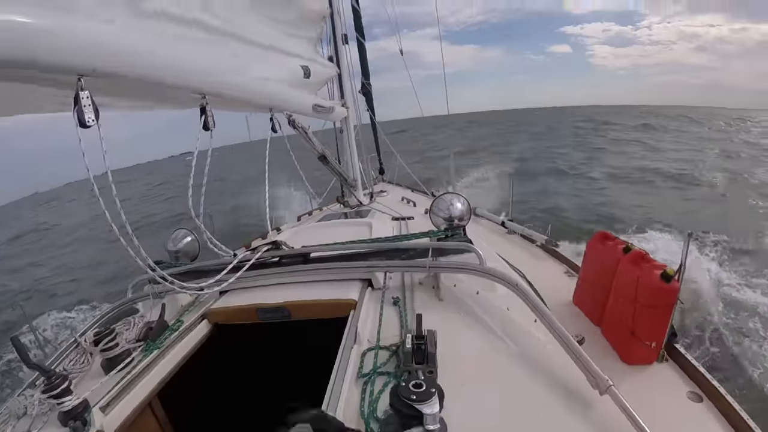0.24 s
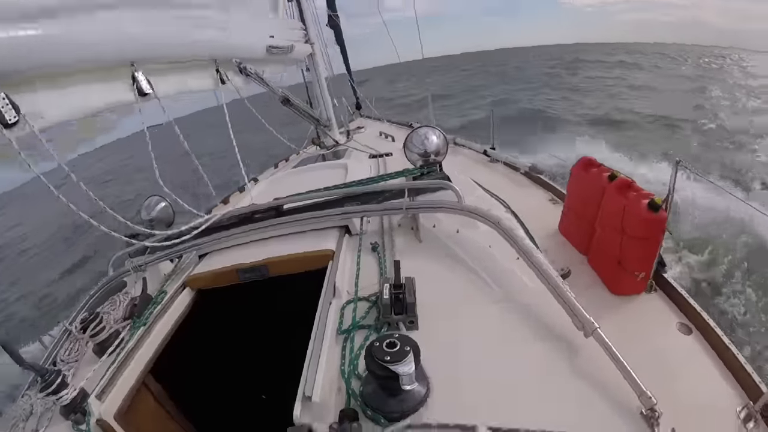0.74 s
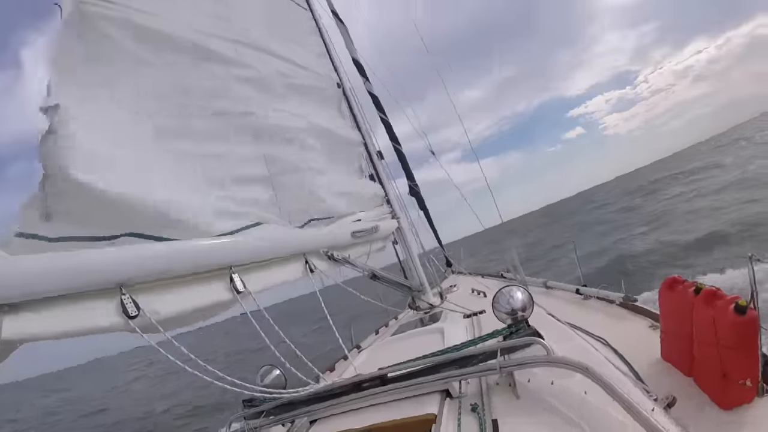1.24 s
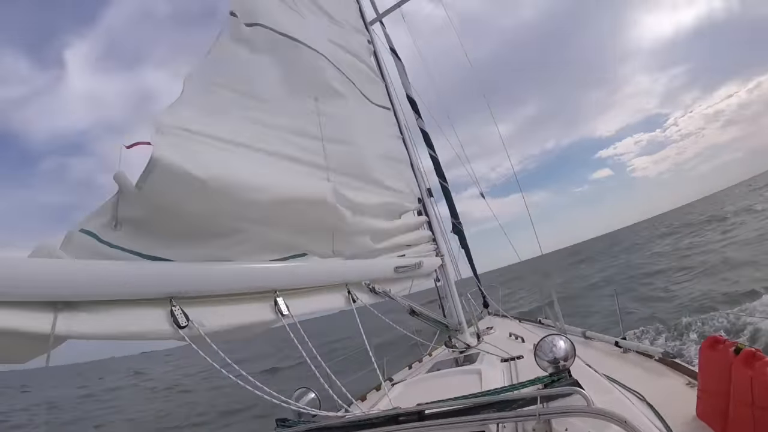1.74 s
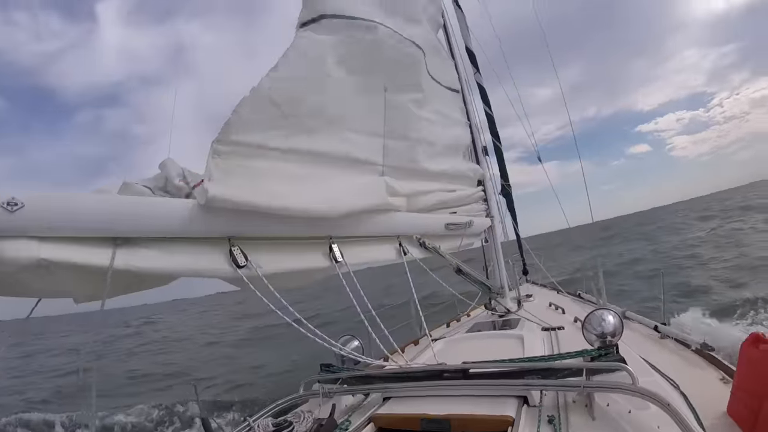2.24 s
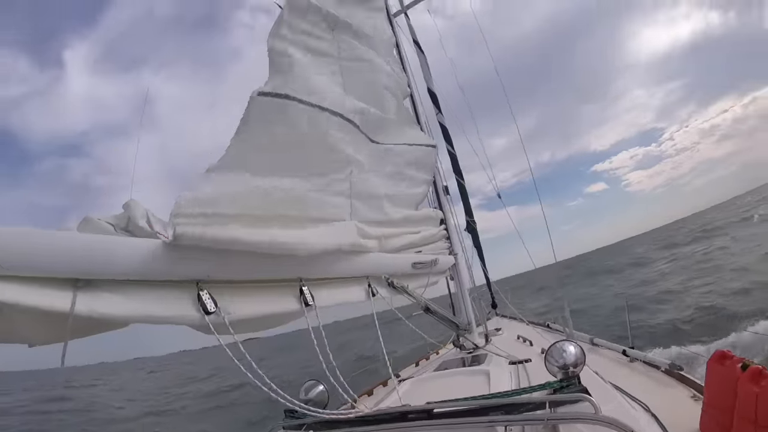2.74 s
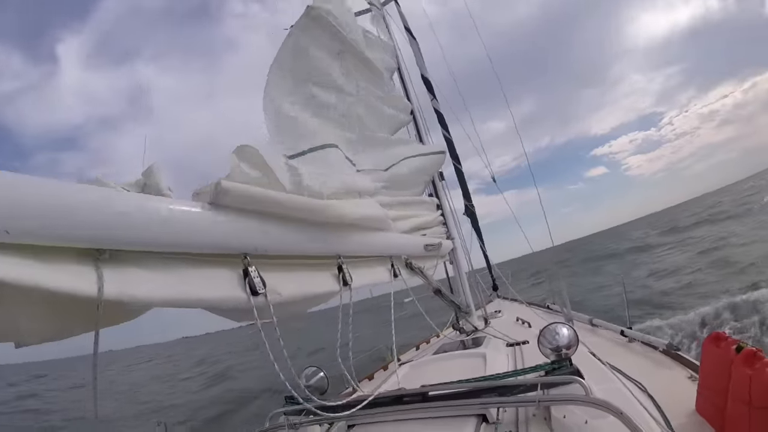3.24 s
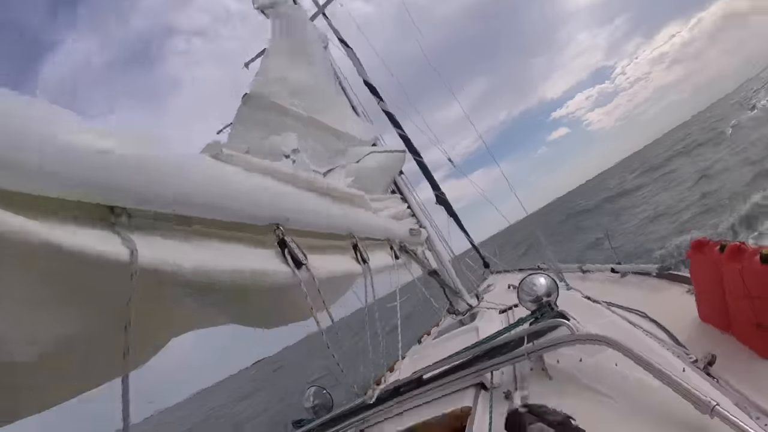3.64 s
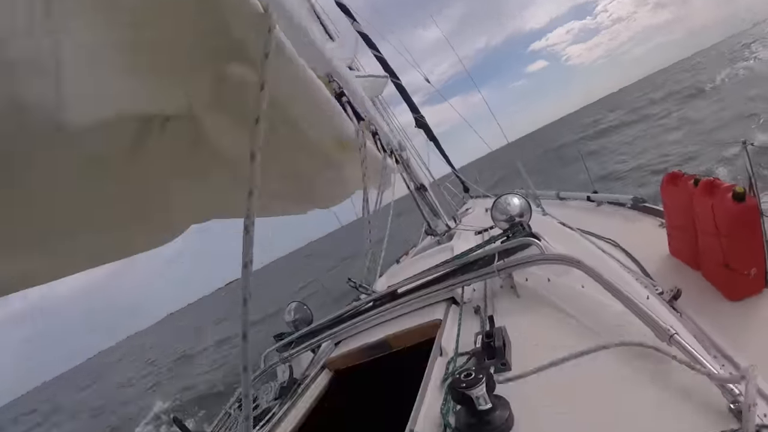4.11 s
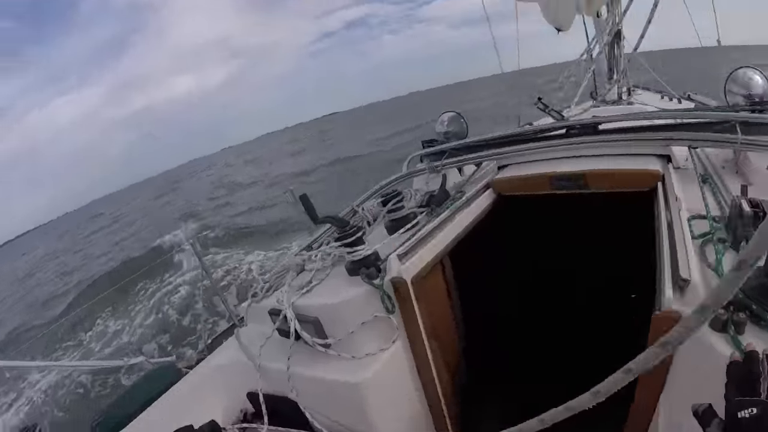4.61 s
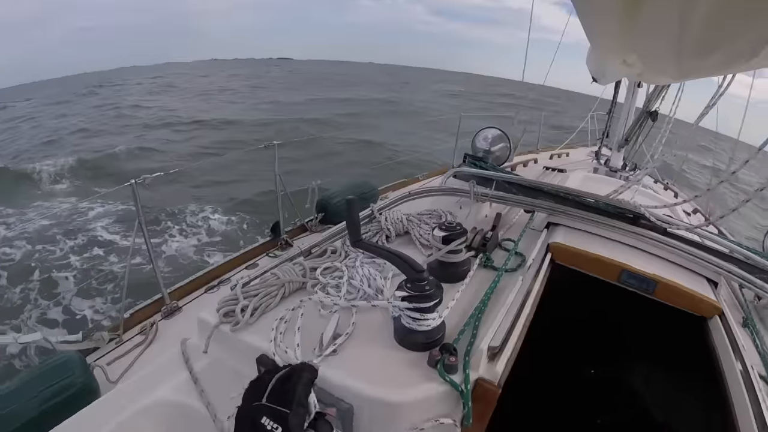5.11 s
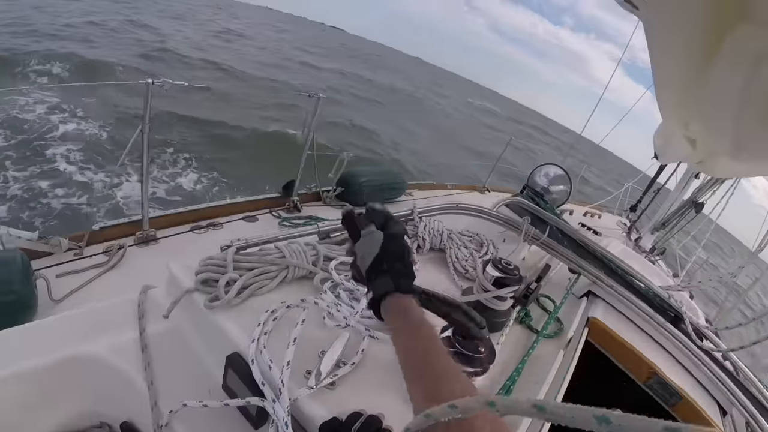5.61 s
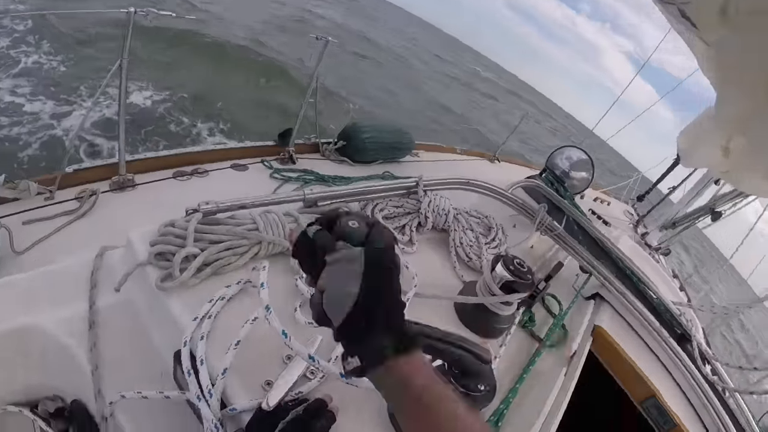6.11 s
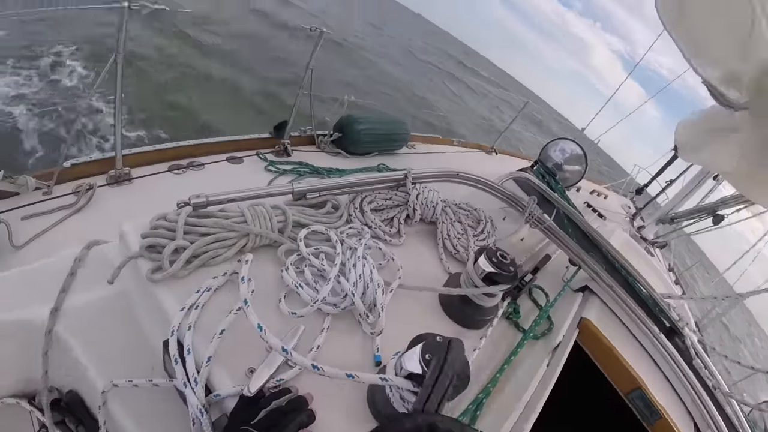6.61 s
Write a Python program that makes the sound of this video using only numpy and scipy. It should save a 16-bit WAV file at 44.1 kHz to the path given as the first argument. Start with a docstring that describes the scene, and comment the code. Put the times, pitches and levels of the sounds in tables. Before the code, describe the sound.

Lumpy wind rumble and roar with cracking sail and rushing water, the water abruptly fainter later, finishing in bright metallic winch ratcheting.

```python
"""On a heeling sailboat, wind buffets a small microphone: filtered noise gives a lumpy rumble and a roar,
and short pointed pushes give the thumps of turbulence. Water hisses past the hull as noise in drifting
patches, until it abruptly drops to a fainter hiss. Loose sail and rigging snap in noise bursts, with thin
ticks between. At the end a winch is cranked: its pawls click, knock and ring the drum. The winch rim rings
high and a block knocks on the deck, both as dying tones; a faint hiss lies behind it all."""
import sys
import numpy as np
from scipy import signal
from scipy.fft import rfft, irfft
from scipy.io import wavfile
from scipy.ndimage import uniform_filter1d

SR = 44100
rng = np.random.default_rng(int(sys.argv[2]) if len(sys.argv) > 2 else 0)


def convert_level_to_amplitude(level_db):
    """Map a level in decibels to its linear amplitude factor."""
    exponent = np.asarray(level_db, float) / 20
    return 10 ** exponent


def materialize(psi):
    """Save the field psi as 16-bit PCM at rate SR to the path in sys.argv[1].

    A 1-D psi becomes a single channel; in a 2-D psi each row is a channel.
    """
    bounded = np.clip(np.atleast_2d(psi).T, -1, 1)
    quanta = np.round(bounded * 32767).astype(np.int16)
    wavfile.write(sys.argv[1], SR, quanta)


N = 302526  # length in samples

# Wind between buffets, before trim: t/s, rumble level/dB, roar level/dB
WIND_LULL = [(0.0, -21.5, -39.5), (0.3, -21, -37), (0.7, -19.5, -38), (1.05, -28, -37.5),
             (1.45, -24, -36.5), (1.9, -21, -35), (2.2, -21.5, -34), (2.65, -25.5, -42), (2.85, -23.5, -39),
             (3.3, -23, -37), (3.85, -20, -30.5), (4.2, -19, -36), (4.5, -15.5, -30), (4.75, -24, -35.5),
             (5.1, -25, -35), (5.5, -19.5, -32.5), (6.1, -21, -29), (6.86, -20.5, -35)]
# Buffets, swells of turbulence, before trim:
# t/s, rumble level/dB, roar level/dB, length/s, extra roar tilt/(dB per octave)
BUFFETS = [(0.409, -9, -27, 0.031, 2), (0.515, -4, -27, .03, 2.5), (0.578, -8, -21, 0.046, -1.5),
           (0.663, -8.5, -17, .04, 4), (0.767, -15.5, -24, 0.057, -10), (0.875, -28, -31.5, 0.063, 11.5),
           (0.957, -9.5, -24.5, 0.029, -10), (1.247, -11, -32.5, 0.084, 5), (1.32, -11, -20.5, 0.048, 2.5),
           (1.4, -16.5, -32, 0.029, 4), (1.556, -22, -28, 0.02, -6), (1.665, -9, -19, 0.028, -0.5),
           (1.75, -21, -29.5, 0.064, -4), (1.853, -7, -16, 0.019, 1), (1.96, -19, -29.5, 0.045, 6.5),
           (2.06, -14.5, -21, 0.08, 0), (2.28, -12.5, -22, 0.056, -1), (2.423, -20.5, -29, 0.1, 2),
           (2.569, -11.5, -19.5, 0.024, -12), (2.818, -34, -29, 0.09, 2.5), (3.041, -11, -20, 0.17, -0.5),
           (3.218, -12, -29, .05, 2), (3.313, -15, -26, 0.057, -5), (3.461, -15.5, -29, 0.088, -3),
           (3.698, -14, -29.5, 0.096, 4), (3.973, -14, -28, 0.12, -8), (4.594, -14, -18.5, 0.08, -0.5),
           (4.771, -9, -20, 0.043, -0.5), (4.924, -16, -36.5, 0.098, 7), (5.061, -9, -30, 0.026, -5),
           (5.218, -9.5, -26.5, 0.032, 3.5), (5.851, -14, -19.5, 0.051, -3), (5.966, -15, -33, 0.06, 7),
           (6.222, -18, -28.5, 0.22, 0.5), (6.351, -13, -22, 0.06, 2), (6.538, -8, -22, 0.063, 2.5),
           (6.646, -13.5, -26.5, 0.054, 6), (6.767, -13.5, -22.5, 0.099, -6)]
# Relative wind spectrum: f/Hz, level per Hz/dB
WIND_COLOUR = [(8.8, -37), (15, -4.5), (60, 1.5), (115, -4), (285, -15.5), (646, -35), (855, -41),
               (1570, -53), (2030, -65.5), (3640, -77.5), (4000, -84.5), (5200, -107), (8800, -120)]
# Eddies bursting on the microphone, before trim: t/s, level/dB, rasp against the push/dB
THUMPS = [(0.567, -18, -10), (0.613, -26.5, 5.5), (0.65, -16, -4), (1.245, -16.5, -16), (1.287, -29, -9),
          (1.31, -16.5, -14), (1.338, -15, -8), (1.662, -33, -7), (1.679, -9, -13.5), (1.856, -21, -19),
          (1.943, -16, -16), (2.053, -17.5, -5.5), (2.086, -10.5, -14), (2.57, -16.5, -21),
          (2.958, -17, -12), (3.015, -23, -14), (3.129, -25.5, -19.5), (3.222, -28, -16), (4.402, -27.5, 3),
          (4.526, -37, -18), (4.555, -11.5, -13), (4.567, -17, -8), (4.607, -16.5, -17),
          (4.646, -22.5, -10), (4.753, -23, -15.5), (4.865, -25, -10.5), (4.769, -23.5, -13),
          (4.906, -17.5, -14.5), (4.951, -18, -15), (5.034, -17, -9), (5.178, -18, -8), (5.191, -22.5, -7),
          (5.212, -16.5, -8), (5.296, -30, -11), (5.378, -17, -28), (5.727, -14, -28), (5.81, -30, -17),
          (5.836, -22.5, -13), (6.155, -21.5, -17), (6.192, -20.5, -10), (6.256, -22.5, -21),
          (6.347, -16.5, -8.5), (6.469, -11, -9.5), (6.764, -12, -13), (6.822, -14.5, -10)]
# Two lists, before and after the abrupt drop, before trim: t/s, level/dB, tilt/(dB per octave)
WATER_LEVELS = [
    [(0.0, -44.5, 1.5), (0.55, -39, 1.5), (1.05, -40, 1), (1.42, -43.5, 1), (2.21, -45, 1),
     (3.23, -46.5, 1), (3.6, -44, 1.5), (3.72, -42.5, 1), (3.82, -43, 1), (3.92, -41, 0.5),
     (4.05, -44.5, 1), (4.25, -42.5, 0), (4.44, -46.5, -0.5)],
    [(4.54, -56, 1.5), (5.08, -57.5, 0), (5.25, -61, 0), (5.95, -52, 0.5), (6.39, -50.5, 2),
     (6.86, -52, -4)],
]
# Relative water spectrum: f/Hz, level per Hz/dB
WATER_COLOUR = [(290, -17), (500, -0.5), (631, -2.5), (816, -4), (900, -4.5), (1110, -8), (1470, -9.5),
                (1720, -11), (3210, -17.5), (4100, -24), (4870, -18.5), (5710, -20.5), (6380, -18.5),
                (7120, -27.5), (9320, -36.5), (12100, -53), (20500, -120)]
# Winch pawls: t/s, click level/dB, click centre f/Hz, knock against click/dB, ring against click/dB
PAWLS = [(5.744, -21, 5940, -24, -3), (5.8077, -24, 5900, -15, -9), (5.8624, -43.5, 4810, 15, -16),
         (5.887, -40, 5800, 1, -17), (5.898, -23, 5480, -5, -6), (5.934, -22, 5000, -19, -9),
         (6.0168, -20, 6500, -12, -8), (6.0461, -19, 6300, -16, -5), (6.0938, -29, 4570, 7, -6),
         (6.104, -15, 6160, -13, -16), (6.127, -18, 6390, -17, -3), (6.173, -19.5, 6330, -20.5, -8),
         (6.208, -19.5, 6000, -20, -7), (6.3011, -35, 6450, 5, -10), (6.349, -13.5, 5800, -21, 3),
         (6.3673, -25, 5400, 10, -19), (6.3819, -13.5, 5660, -17, 6), (6.4047, -27, 5710, 6, -28),
         (6.4168, -13.5, 5540, 4, 0.5), (6.4714, -19.5, 6060, -15, -2.5), (6.5102, -17, 5660, -12, 11.5),
         (6.5483, -17, 5860, -14, 11.5), (6.5807, -12.5, 5800, -9, 5.5), (6.624, -21.5, 5860, 5, -8),
         (6.6475, -35, 6380, -3, -13), (6.6587, -15, 5800, 2, 4), (6.7486, -28.5, 5750, -20, -22),
         (6.7622, -9.5, 8100, 2.5, 1), (6.826, -21.5, 5860, -20, -19), (6.841, -25.5, 4510, 13.5, -6)]
# Modes of the winch drum: f/Hz, greatest level/dB, time to fall 60 dB/s
DRUM_MODES = [(1666, -21.5, 0.033), (5200, -23, .035), (5660, -7, 0.045), (5780, -16.5, 0.04),
              (6500, -24, 0.025), (10750, -31.5, 0.05)]
# Sail cloth and rigging: t/s, level/dB, time to fall 60 dB/s, tilt/(dB per octave)
SNAPS = [(0.0778, -7.5, 0.023, -3), (0.5445, -20, 0.15, -2.5), (0.609, -23, 0.056, -11),
         (0.6453, -11, 0.048, -0.5), (0.727, -25, 0.045, -1.5), (0.826, -8, 0.059, 5.5),
         (1.2698, -27.5, 0.11, 1.5), (1.4088, -33, 0.16, 2), (1.6103, -25, 0.051, -1.5),
         (1.787, -28.5, 0.087, -1.5), (1.8316, -27.5, 0.068, 0), (1.8574, -26, 0.08, 1.5),
         (2.713, -33, 0.07, 2), (2.9542, -15, 0.033, -4), (3.1296, -31, 0.045, 9),
         (3.1432, -22.5, 0.061, -2), (3.2174, -24.5, 0.029, 7), (3.274, -35, 0.041, 6),
         (3.2887, -23.5, 0.041, 2.5), (3.5548, -22, 0.053, -4.5), (3.678, -29, 0.12, 1),
         (4.0486, -28.5, 0.11, -0.5), (5.13, -28, 0.095, -4), (5.59, -25.5, 0.04, -1.5),
         (5.6084, -34, 0.088, -3), (5.6394, -31, 0.066, -8)]
# Relative snap spectrum: f/Hz, level per Hz/dB
SNAP_COLOUR = [(400, -25), (800, -3), (1500, 0), (3000, -4), (4000, -9), (5500, -6), (7000, -14),
               (9300, -24), (12000, -46), (15500, -65)]
# High rings of the winch rim: t/s, level/dB, f/Hz, time to fall 60 dB/s
RIM_RINGS = [(6.4694, -39, 8540, 0.044), (6.6253, -48, 8430, 0.079), (6.663, -35, 9150, 0.03),
             (6.763, -33, 8300, 0.027)]
# Modes of a block knocking on the deck: t/s, level/dB, f/Hz, time to fall 60 dB/s
BLOCK_KNOCKS = [(5.129, -28, 1000, 0.03), (5.129, -29.5, 1500, 0.04), (5.129, -41.5, 3500, 0.033)]
# Thin dry ticks: t/s, peak level/dB
TICKS = [(4.5062, -31), (4.567, -37), (4.9533, -37), (4.9837, -33), (5.178, -43)]
# Microphone response for near clicks: f/Hz, level/dB
MIC_RESPONSE = [(20, -5), (8000, 0), (9500, -5), (11000, -19), (13000, -31.5), (16000, -53)]
# Relative spectrum of the faint top hiss: f/Hz, level per Hz/dB
AIR_COLOUR = [(8000, -31.5), (11000, 2), (13000, -5), (15500, -21.5)]


def evened(x):
    """Scales a sound to an rms (average strength) of 1."""
    return x / np.sqrt(np.mean(x ** 2) + 1e-20)


def smoothed(x, size):
    """Takes a running average twice, for a soft-edged smoothing."""
    return uniform_filter1d(uniform_filter1d(x, size=size), size=size)


def read(points, hz):
    """Reads a spectrum table at the given frequencies, on a log scale."""
    f, value = np.transpose(points)
    return np.interp(np.log(hz + 1), np.log(f + 1), value)


def add(mix, s, sound):
    """Mixes a sound in at time s, in seconds."""
    part = mix[max(round(s * SR), 0):][:len(sound)]
    part += sound[:len(part)]


def coloured(x, shape_db):
    """Filters x by a function that gives dB for each frequency."""
    hz = np.fft.rfftfreq(len(x), 1 / SR)
    return irfft(rfft(x) * convert_level_to_amplitude(shape_db(hz)), len(x))


def chance(shape, frames, bins):
    """Makes a smooth random field of rms 1: shape is (time, frequency), the result is turned over."""
    field = rng.standard_normal(shape)
    field = uniform_filter1d(field, max(round(frames), 1), 0)
    field = uniform_filter1d(field, max(round(bins), 1), 1)
    return evened(field).T


def burst(noise, t60, shape_db, rise):
    """A coloured noise burst with a quick rise and an exponential tail, peak near 1."""
    t = np.arange(len(noise)) / SR
    envelope = (1 - np.exp(-t / rise)) * convert_level_to_amplitude(-60 * t / max(t60, .004))
    return 0.32 * evened(coloured(noise, shape_db)) * envelope


def wind(lump_db=4.0, patch_db=3.0, split_hz=170, reach=0.89):
    """Turbulence: a slow rumble and a rougher roar that lurch from eddy to eddy."""
    def rumble_colour(hz):
        return read(WIND_COLOUR, hz) - 10 * np.log10(1 + (hz / split_hz) ** 6)

    def roar_colour(hz):
        return read(WIND_COLOUR, hz) - 10 * np.log10(1 + (split_hz / (hz + 1)) ** 6)

    noise = rng.standard_normal((2, N))
    rumble = steady(coloured(noise[0], rumble_colour), 0.088, 1.0)
    roar = steady(coloured(noise[1], roar_colour), 0.013, 0.16)
    hz, frame_t, z = signal.stft(roar, SR, nperseg=512, noverlap=384)
    rumble_db, roar_db, rasp_db = gusting(frame_t)

    # stronger gusts carry smaller eddies, so the roar brightens with its level
    octaves = np.log2(np.clip(hz, 300, 2500) / 300)
    brighter_db = np.outer(octaves, reach * (roar_db + 28.5) / 5 + rasp_db)
    patches_db = patch_db * chance((len(frame_t), len(hz)), 6, 3)
    roar = signal.istft(z * convert_level_to_amplitude(brighter_db + patches_db), SR, nperseg=512, noverlap=384)[1][:N]

    lumps_db = lump_db * evened(smoothed(rng.standard_normal(N), 260))
    t = np.arange(N) / SR
    rumble_gain = convert_level_to_amplitude(np.interp(t, frame_t, rumble_db) + .5 * lumps_db - 1.45)
    roar_gain = convert_level_to_amplitude(np.interp(t, frame_t, roar_db) + lumps_db - 0.5)
    return rumble * rumble_gain + roar * roar_gain


def steady(x, seconds, share):
    """Takes out a share of the noise's own swelling, so that it follows the gusts more closely."""
    power = smoothed(x ** 2, round(seconds * SR))
    return evened(x / (abs(power) + 0.055 * power.mean()) ** (share / 2))


def gusting(t):
    """Adds the power of the lull and every buffet: rumble dB, roar dB and roar-weighted tilt."""
    s, rumble_db, roar_db = np.transpose(WIND_LULL)
    at, peak_db, top_db, length, rasp_db = np.transpose(BUFFETS)[:, :, None]
    # a flat-topped bell, at half power one half length from its middle
    bell = np.exp(-16 * np.log(2) * ((t - at) / np.maximum(length, .015)) ** 4)
    rumble = convert_level_to_amplitude(2 * np.interp(t, s, rumble_db)) + (convert_level_to_amplitude(2 * peak_db) * bell).sum(0)
    buffet_roars = convert_level_to_amplitude(2 * top_db) * bell
    roar = convert_level_to_amplitude(2 * np.interp(t, s, roar_db)) + buffet_roars.sum(0)
    return 10 * np.log10(rumble), 10 * np.log10(roar), (buffet_roars * rasp_db).sum(0) / roar


def thumps(slope_db=14, gain_db=-1, rasp_hz=1000, cusp_db=-1, sharp=0.074):
    """Each eddy is a few low swings around one pointed push, roughened by a short rasp."""
    typical_s, small_count, small_db, small_rasp_db = 0.0113, 24, -24, -25
    out = np.zeros(N)
    # the lesser eddies fall by chance
    small = [(a * N / SR, small_db + 8 * (b - .5), small_rasp_db) for a, b in rng.random((small_count, 2))]
    eddies = THUMPS + small
    for (s, db, rasp_db), noise in zip(eddies, rng.standard_normal((len(eddies), 2, 2048))):
        length = max(typical_s * (1 + 0.084 * noise[0, 0]), .004)
        u = np.arange(2048) / SR / length  # time in eddy lengths
        bell = np.sin(np.pi * np.clip(u / 2, 0, 1)) ** 2 * np.exp(-1.2 * u)
        body = evened(coloured(noise[0], lambda hz: -6.5 * np.log2((hz + 20) * length / 3.1) ** 2))
        swings = body * bell / abs(body * bell).max()
        # a narrow push, less a wider dip
        point = 1 / (1 + ((u - .6) / sharp) ** 2) - 0.29 * np.exp(-((u - .95) / 0.54) ** 2)
        push = convert_level_to_amplitude(cusp_db) * 4.7 * point * bell
        rasp = evened(coloured(
            noise[1], lambda hz: -slope_db * np.log2(1 + (hz / rasp_hz) ** 2) / 2 - 30 * (hz < 400)))
        add(out, s - .004, convert_level_to_amplitude(db + gain_db) * (swings + push + convert_level_to_amplitude(rasp_db) * rasp * bell))
    return out


def water(patch_db=1.0, splash_db=1.5, drops_per_s=900, drop_db=-9, spread_db=2.0):
    """Dense hiss of foam in drifting patches, with single drops of spray on top."""
    drop_s, trim_db = 4.508, 4.0  # time of the abrupt drop in level
    falls = rng.random(N) < drops_per_s / SR
    spray_sizes = convert_level_to_amplitude(spread_db * np.minimum(rng.exponential(1, N), 5)) * falls
    one_spray_drop = rng.standard_normal(400) * np.exp(-np.arange(400) / 90)
    spray = signal.oaconvolve(spray_sizes, one_spray_drop)[:N]
    foam = rng.standard_normal(N) + convert_level_to_amplitude(drop_db) * evened(spray)
    foam = evened(coloured(foam, lambda hz: read(WATER_COLOUR, hz)))
    hz, t, z = signal.stft(foam, SR, nperseg=256)

    # level and tilt jump at the drop
    before, after = ([np.interp(t, s, column) for column in rest]
                     for s, *rest in map(np.transpose, WATER_LEVELS))
    level_db, tilt_db = np.where(t < drop_s, before, after)
    field_db = level_db + np.outer(np.log2((hz + 100) / 4000), tilt_db)
    field_db += patch_db * chance((len(t), len(hz)), 20, 4)
    field_db += splash_db * chance((len(t), 1), 8, 1)
    return convert_level_to_amplitude(trim_db) * signal.istft(z * convert_level_to_amplitude(field_db), SR, nperseg=256)[1][:N]


def winch(width=0.13, skirt_db=-11, knock_hz=2000, scatter_db=16.0, uneven_db=5):
    """A pawl drops on the next tooth: bright click, duller knock, and the drum rings on."""
    click_t60_s, knock_t60_s = 0.033, 0.041
    out, t = np.zeros(N), np.arange(8192) / SR
    noises = rng.standard_normal((len(PAWLS), 2, 8192))
    lucks = rng.random((len(PAWLS), len(DRUM_MODES), 2))
    for (s, db, hz, knock_db, ring_db), noise, luck in zip(PAWLS, noises, lucks):
        def click_colour(f):
            peak = np.exp(-(np.log(f / hz + 1e-9) / width) ** 2)
            skirt = convert_level_to_amplitude(2 * skirt_db) * (f > 1800)
            # every tooth has its own small resonances, so no two clicks share a colour
            uneven = uneven_db * evened(smoothed(noise[1][:len(f)], 90))
            return 10 * np.log10(peak + skirt + 1e-6) + read(MIC_RESPONSE, f) + uneven

        click = burst(noise[0], click_t60_s, click_colour, rise=0.00028)
        knock = burst(noise[1], knock_t60_s, lambda f: -9.0 * np.log2(f / knock_hz + 1e-9) ** 2, rise=0.0028)
        # each blow lands elsewhere and wakes the modes unevenly
        ring = np.zeros(len(t))
        for (f, mode_db, t60), (phase, miss) in zip(DRUM_MODES, luck):
            mode_hz = f * (1 + 0.005 * (miss - .5))
            fading = convert_level_to_amplitude(mode_db - scatter_db * miss - 60 * t / t60)
            ring += fading * np.sin(2 * np.pi * (mode_hz * t + phase))
        ring *= 1 - np.exp(-t / 0.00092)
        add(out, s - .001, convert_level_to_amplitude(db) * (click + convert_level_to_amplitude(knock_db) * knock + convert_level_to_amplitude(ring_db) * ring))
    return out


def snaps():
    """Cloth cracking taut: a broad crack that fades into a short rustle."""
    out = np.zeros(N)
    for (s, db, t60, tilt_db), noise in zip(SNAPS, rng.standard_normal((len(SNAPS), 8192))):
        shape = lambda hz: read(SNAP_COLOUR, hz) + tilt_db * np.log2((hz + 100) / 4000)
        add(out, s - .001, convert_level_to_amplitude(db) * burst(noise, t60, shape, rise=0.001))
    return out


def rim_rings_and_knocks():
    """The struck rim and block each ring in modes: sine tones that die away."""
    out, t = np.zeros(N), np.arange(8192) / SR
    for s, db, hz, t60 in RIM_RINGS + BLOCK_KNOCKS:
        tone = np.sin(2 * np.pi * hz * t) * (1 - np.exp(-t / 0.00062))
        add(out, s, convert_level_to_amplitude(db - 60 * t / t60) * tone)
    return out


def ticks():
    """Single filtered impulses, heard as thin wide clicks."""
    impulse = np.zeros(512)
    impulse[256] = 1
    tick = coloured(
        impulse, lambda hz: read(MIC_RESPONSE, hz) - 30 * (hz < 1200) - 2 * np.log2((hz + 200) / 3000))
    out = np.zeros(N)
    for s, db in TICKS:
        add(out, s - 256 / SR, convert_level_to_amplitude(db) * tick / tick.max())
    return out


def air():
    """A faint steady noise hiss at the very top, with an rms of -85 dB."""
    return convert_level_to_amplitude(-85) * evened(coloured(rng.standard_normal(N), lambda hz: read(AIR_COLOUR, hz)))


def scene():
    """All sources add up at one microphone, with a very short fade at the end."""
    mix = wind() + thumps() + water() + winch() + snaps() + rim_rings_and_knocks() + ticks() + air()
    fade = np.clip((N - np.arange(N)) / 150, 0, 1)
    return mix[None] * fade


def low_pass(x):
    """Removes everything above the highest recorded frequency."""
    return signal.sosfilt(signal.butter(12, 15760, fs=SR, output="sos"), x)


def record(dry):
    """The input stage squashes the strongest buffets by smoothly bending their peaks."""
    ceiling = 0.78  # of full scale
    squashed = ceiling * np.tanh(dry / ceiling)
    return low_pass(squashed)


dry = scene()
out = record(dry)
materialize(out)
```